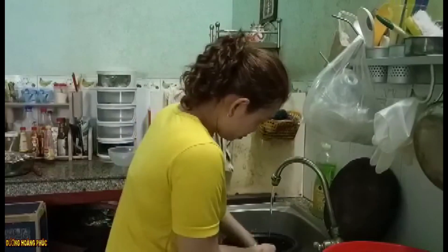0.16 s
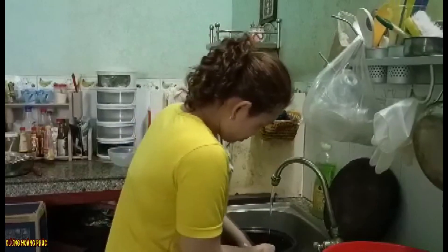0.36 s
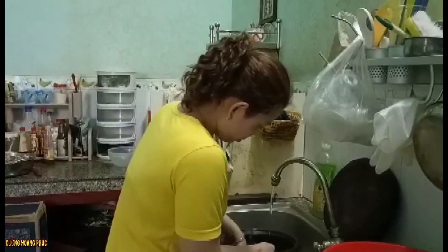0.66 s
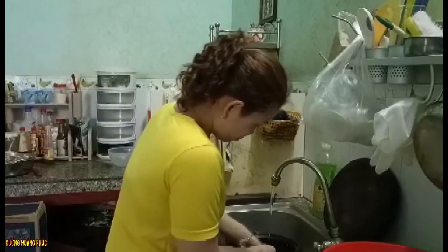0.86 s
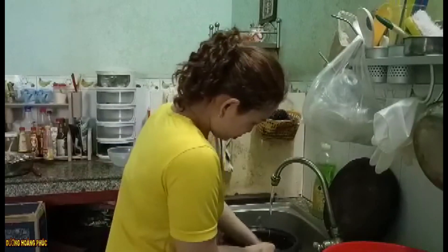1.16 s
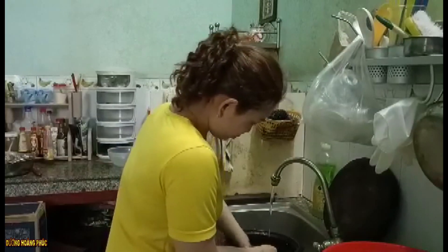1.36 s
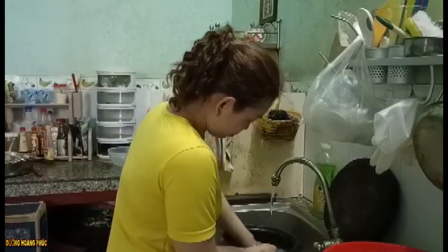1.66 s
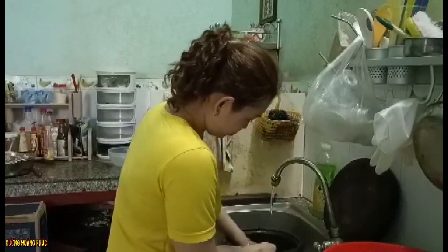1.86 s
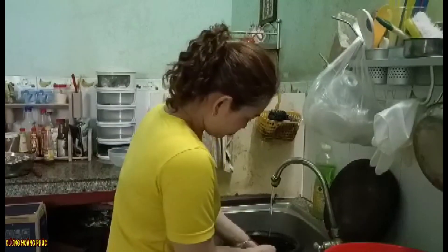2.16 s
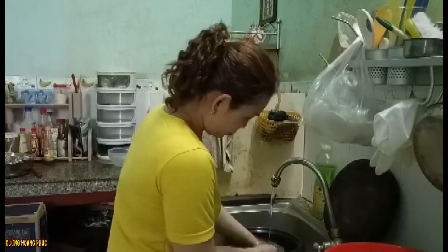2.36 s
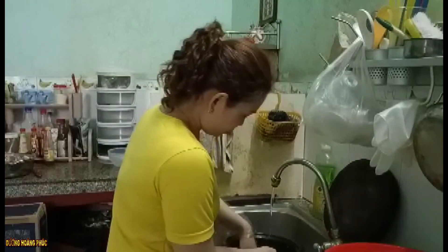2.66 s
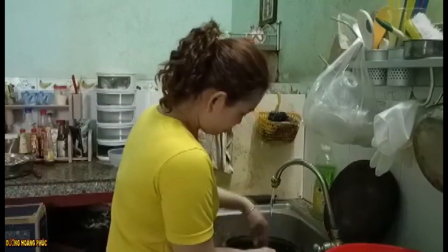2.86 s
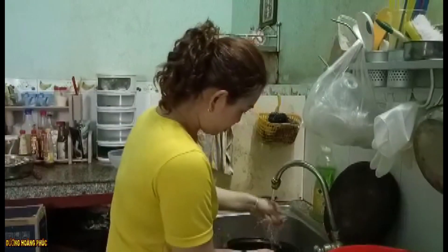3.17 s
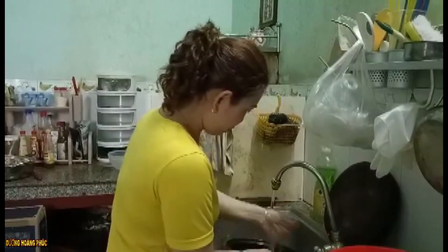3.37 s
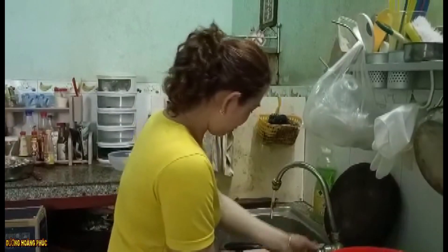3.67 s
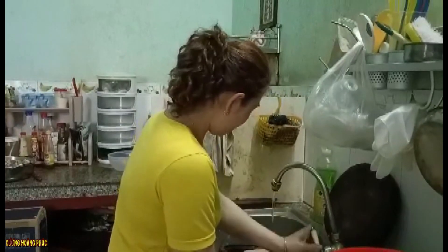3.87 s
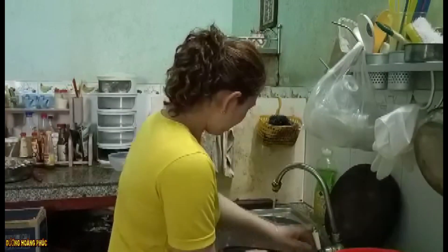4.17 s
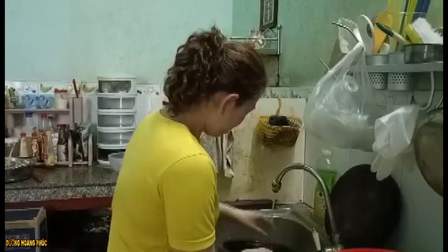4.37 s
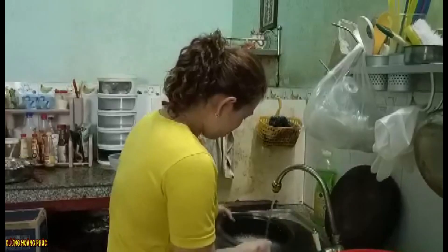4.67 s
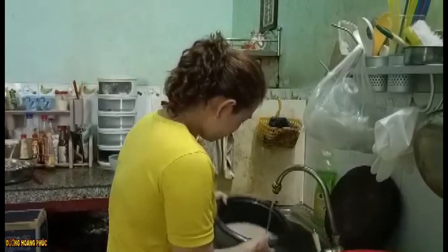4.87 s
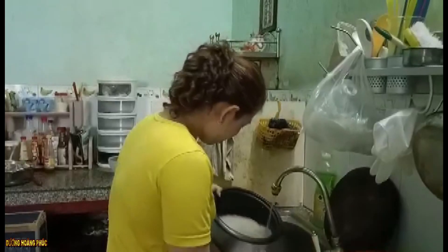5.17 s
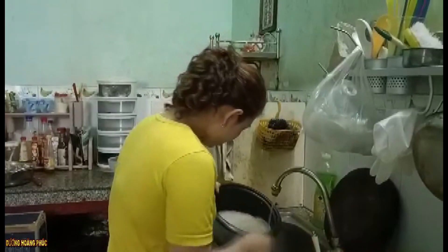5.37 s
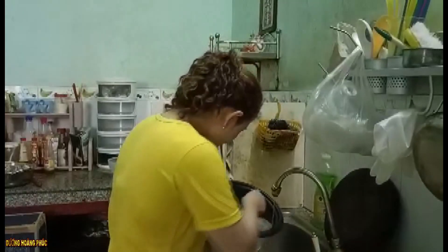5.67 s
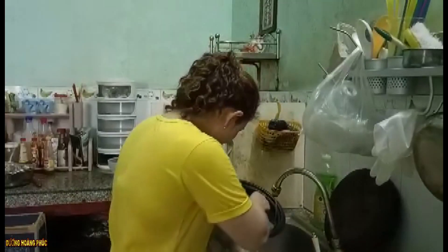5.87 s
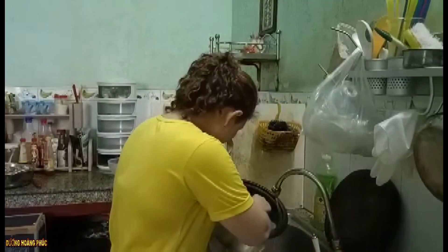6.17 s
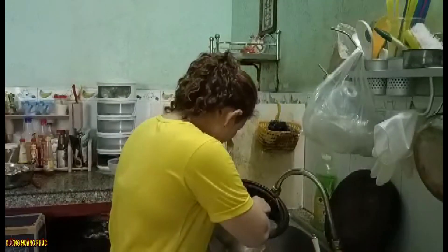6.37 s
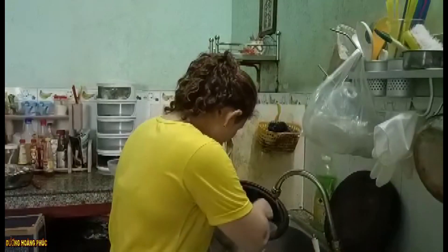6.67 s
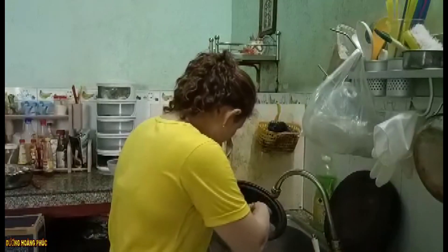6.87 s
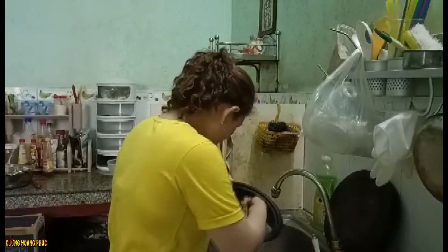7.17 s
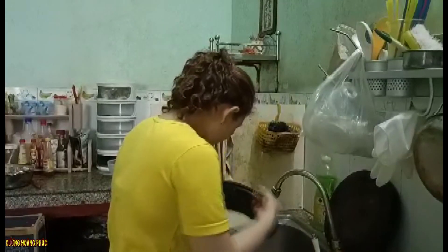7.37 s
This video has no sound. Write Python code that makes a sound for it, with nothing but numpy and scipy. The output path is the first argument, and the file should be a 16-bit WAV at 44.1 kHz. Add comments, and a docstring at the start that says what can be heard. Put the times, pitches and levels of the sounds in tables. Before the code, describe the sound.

Rice is swished by hand in a pot under a thin tap, splashing and clacking, then rinse water drums into a steel sink.

```python
"""Washing rice under a thin tap

Rice is washed by hand in a pot in the steel sink of a small tiled kitchen; every layer is synthesized.
The stream is a fizz of tiny ringing bubbles that flares as the circling hand cuts it. Strokes swell beds of
larger bubbles, rising sines plop, struck modes clack, and filtered slips scrape the pot on the sink.
Then the pot is tilted and rinse water, as dense random impacts, drums the sink's resonances in a few surges."""
import sys
import numpy as np
from scipy import signal
from scipy.fft import rfft, irfft, next_fast_len
from scipy.io import wavfile

SR = 44100
rng = np.random.default_rng(int(sys.argv[2]) if len(sys.argv) > 2 else 0)


def log_audio(samples):
    """Write samples as a 16-bit WAV file to the path given in sys.argv[1]."""
    # one column per channel
    frames = np.atleast_2d(samples).T
    # limit to full scale, then quantise
    limited = np.clip(frames, -1, 1)
    pcm = np.round(limited * 32767).astype(np.int16)
    wavfile.write(sys.argv[1], SR, pcm)


N = 332053
TIME = np.arange(N) / SR
KITCHEN_T60_S = 0.46
CUTOFF_HZ = 13200

# fizz of the stream landing, fading as the pot is lifted away: time_s, level_db
STREAM = [(0.0, -45.5), (0.9, -47), (1.35, -52), (2.2, -47.5), (2.6, -52), (3.35, -56), (4.0, -49),
          (4.85, -52.5), (5.05, -58.5), (5.7, -60), (6.0, -66), (7.525, -69.5)]


def washing(slosh_gain, splash_gain, spray_gain):
    """The hand traps large bubbles and breaks up small ones, both in the pot's hollow, and throws spray."""
    # colours of large bubbles, small bubbles and droplets: pitch_hz, level_db (per Hz)
    slosh_colour = [(250, -11), (400, -1), (560, -2), (780, 6), (1100, 11.5), (1500, 6.5), (2000, 5.5),
                    (3000, -17)]
    splash_colour = [(1000, -84), (1500, 3.5), (1900, 8.5), (2200, 10.5), (2600, 9.5), (3200, 6.5),
                     (4200, -47)]
    spray_colour = [(2000, -15), (2800, 7.5), (3500, 5), (4000, 4), (4700, 5), (5600, 1.5), (6800, -5),
                    (8500, -2.5), (12000, -105)]
    # peaks and dips of the pot's hollow: pitch_hz, q, gain_db
    hollow = [(590, 6.2, 1.5), (837, 6.9, -7), (1180, 13, 7.5), (1590, 17, 0.5), (2200, 12, 1),
              (2904, 11, -9)]

    large = bubbles(slosh_colour, per_s=700, cycles=18, spread_db=4.2, clump_db=3.0)
    slosh = slosh_gain * from_db(2) * rms_one(resonate(large, hollow))
    small = bubbles(splash_colour, per_s=520, cycles=20, spread_db=2.5, clump_db=2.6)
    splash = splash_gain * from_db(-3.5) * rms_one(resonate(small, hollow))
    droplets = bubbles(spray_colour, per_s=5000, cycles=110, spread_db=6.0, clump_db=2.0)
    spray = spray_gain * from_db(2.5) * droplets
    return slosh + splash + spray


def stirring():
    """Gains of slosh, splash and spray: the strokes on top of the stream's own trickle."""
    # strokes of the hand and swings of the pot:
    # start_s, length_s, slosh_db (large bubbles), splash_db (small bubbles), spray_db (droplets)
    strokes = [(0.0, 0.1, -42.5, -34.5, -52), (0.117, 0.072, -39.5, -32.5, -47),
               (0.222, .14, -43, -35, -46), (0.387, 0.09, -40.5, -34, -44),
               (0.465, 0.059, -39.5, -34, -43.5), (0.549, 0.24, -44, -36, -50),
               (1.063, 0.076, -56, -41, -47.5), (1.137, 0.08, -42.5, -55, -52),
               (1.25, 0.046, -53, -34.5, -55), (1.467, 0.11, -54, -46, -70),
               (1.664, 0.029, -54, -41.5, -51), (1.837, 0.087, -63, -47, -57),
               (2.552, 0.25, -61, -43.5, -56), (2.957, 0.083, -54, -43.5, -41),
               (3.078, 0.02, -52.5, -64, -48), (3.461, 0.078, -48.5, -72, -61),
               (3.544, 0.094, -49.5, -33, -46.5), (4.29, 0.11, -46.5, -41, -42),
               (4.465, 0.069, -44, -49, -66), (4.626, 0.085, -39.5, -36, -49),
               (4.739, 0.091, -53, -41.5, -48), (4.88, 0.15, -56, -48.5, -51.5),
               (5.02, 0.18, -51, -53, -51.5), (5.214, 0.12, -56.5, -51, -56), (5.363, 0.017, -50, -35, -50),
               (6.935, 0.16, -57, -55.5, -70)]
    trickle_levels_db = (-65, -49.5, -54.5)  # slosh, splash and spray at the start
    trickle_follows = 0.49  # share of the stream's fading, in dB

    stream_db, = in_time(STREAM)
    fading_db = trickle_follows * (stream_db - stream_db[0])
    start_s, length_s, *levels = np.transpose(strokes)
    gains = []
    for level_db, trickle_db in zip(levels, trickle_levels_db):
        stroke_gain = swells(zip(start_s, length_s, level_db), rise_s=0.0054, settle_db_per_s=153)
        gains.append(np.hypot(stroke_gain, from_db(trickle_db + fading_db)))
    return gains


def tap():
    """The thin stream bursts into tiny, short-lived bubbles, louder where it breaks on the hand."""
    # flares as the circling hand cuts the stream: start_s, length_s, level_db
    flares = [(0.11, 0.1, -37.5), (0.41, 0.048, -37), (0.8, 0.026, -42), (1.05, 0.015, -39),
              (1.48, 0.063, -38.5), (1.96, 0.063, -39), (2.33, 0.033, -40), (2.81, 0.27, -41.5),
              (3.55, 0.0058, -35), (3.75, 0.08, -43), (4.235, 0.012, -37), (4.63, 0.022, -46),
              (4.87, 0.016, -45.5), (5.68, 0.017, -71)]
    # colour of the fizz: pitch_hz, level_db (per Hz)
    fizz_colour = [(900, -75), (2000, -12), (3000, -44), (4000, -4), (5000, 3), (6600, 4.5), (8000, 8.5),
                   (10000, 7.5), (13000, 0.5)]

    stream_db, = in_time(STREAM)
    gain = np.hypot(from_db(stream_db), swells(flares, rise_s=0.032, settle_db_per_s=141))
    fizz = bubbles(fizz_colour, per_s=4500, cycles=11.4, spread_db=3.0, clump_db=2.5)
    return gain * from_db(-0.5) * fizz


def gush():
    """The water shatters on the steel into a dense burst of droplets."""
    # a gush against the sink wall: time_s, level_db
    gush_curve = [(4.085, -53), (4.108, -40), (4.117, -27.5), (4.145, -21), (4.2, -26.5), (4.235, -23),
                  (4.29, -28.5), (4.35, -35.5), (4.45, -57)]
    # its colour: pitch_hz, level_db (per Hz)
    gush_colour = [(350, -16), (580, -5), (800, -11.5), (1130, 2.5), (1480, -7.5), (1850, 3.5), (2230, 6),
                   (2550, 7.5), (2850, -1), (3200, 5), (3600, 9), (4050, -17), (4600, 0), (6500, -5.5),
                   (8500, -14), (12500, -58)]

    level_db, = in_time(gush_curve)
    falling = (TIME > gush_curve[0][0]) & (TIME < gush_curve[-1][0])
    droplets = bubbles(gush_colour, per_s=1800, cycles=15, spread_db=2.8, clump_db=0.8)
    return falling * from_db(level_db) * droplets


def plops(swell_s, rise, level_db):
    """The air pockets and drips that stand out, each a sine of rising pitch placed left to right."""
    # air pockets and drips: start_s, relative_db, pitch_hz (middle of the rise), left_over_right_db, t60_s
    plop_list = [(0.026, -26, 1104, -11, 0.056), (0.03, -28, 2700, -3, 0.011),
                 (0.088, -23.5, 2160, -4, 0.0093), (0.122, -26, 2200, 3, 0.022),
                 (0.143, -23.5, 1106, -6, 0.034), (0.173, -24, 2220, -4, 0.0064),
                 (0.172, -29, 1580, -4, .02), (0.2, -30, 1000, -7, 0.028), (0.229, -31, 1630, 5, .014),
                 (0.282, -33.5, 915, 2, .025), (0.284, -29, 1480, -4, 0.026),
                 (0.326, -31.5, 1120, -6, 0.018), (0.366, -33, 2200, -1, .015),
                 (0.393, -20, 2340, 0, 0.017), (0.407, -23, 2330, 2, 0.013), (0.424, -20.5, 2230, 1, 0.016),
                 (0.475, -22, 2230, -2, 0.01), (0.495, -27, 2140, 0, 0.013), (0.497, -36, 630, 0, 0.035),
                 (0.547, -29, 2200, -8, 0.013), (0.572, -28, 2200, -3, 0.019),
                 (0.575, -36.5, 746, 6, 0.027), (0.602, -31, 2340, -7, 0.011), (0.602, -36.5, 565, 0, .025),
                 (0.608, -27.5, 1620, 2, 0.022), (0.626, -30.5, 2200, 3, 0.027),
                 (0.677, -29, 2110, 9, 0.014), (0.681, -30.5, 1085, -3, 0.022),
                 (0.82, -28.5, 2200, 6, 0.018), (1.172, -42.5, 724, 7, 0.072), (1.259, -32, 1015, -8, 0.02),
                 (1.701, -23, 965, -3, 0.028), (1.714, -27.5, 1640, 1.5, 0.022),
                 (1.84, -34, 2790, -2, 0.017), (1.897, -32.5, 2200, -2, 0.015),
                 (1.972, -43.5, 2260, 7, 0.065), (2.717, -39.5, 1110, -6, 0.036),
                 (2.729, -18.5, 2310, -5, 0.018), (2.729, -30.5, 1720, 2, 0.021),
                 (3.11, -47.5, 1257, 0, .15), (3.308, -30, 2352, -2, 0.095), (3.516, -36, 1240, -2, .025),
                 (3.533, -24, 1940, -7, 0.013), (3.573, -33, 1190, -7, .03),
                 (3.589, -13, 2330, -1.5, 0.0093), (3.617, -30, 894, -3, 0.038),
                 (3.621, -22, 2800, -1, 0.022), (3.657, -29, 2370, 0, 0.016), (4.096, -35, 2890, 8, .015),
                 (4.181, -16, 2240, 0, 0.017), (4.2, -22.5, 2146, 11, 0.029), (4.22, -36, 2230, -17, .022),
                 (4.377, -25.5, 1135, -8, 0.022), (4.485, -22.5, 1467, 1, 0.021),
                 (4.495, -30, 1405, 2, 0.021), (4.637, -28, 1124, -10, .02),
                 (4.662, -23.5, 1190, -1, 0.012), (4.685, -21, 2065, -2, 0.018),
                 (4.745, -28.5, 2086, 9, 0.033), (4.768, -29.5, 2026, -1, 0.062),
                 (4.967, -39, 2720, 0, 0.023), (4.994, -33.5, 2500, -1, 0.007),
                 (5.049, -32, 1845, -9, 0.03), (5.076, -37, 2380, -1, 0.018),
                 (5.108, -29.5, 2340, -2, 0.016), (5.215, -42, 1250, -3, 0.033),
                 (5.231, -32, 2060, 6, 0.034), (5.277, -41, 1580, -4, .025), (5.396, -44, 1010, -4.5, .05),
                 (5.599, -42.5, 2510, 12, 0.019)]

    out = np.zeros((2, N))
    for start_s, relative_db, hz, pan_db, t60 in plop_list:
        sides_db = pan_db * np.array([[.5], [-.5]])
        plop = from_db(relative_db + level_db + sides_db) * pocket(hz, t60, swell_s, rise)
        add(out, start_s - swell_s / 2, plop)
    return out


def gurgle(water_gain, low_hz, high_hz, level_db, count):
    """Pockets close at random times, pitches and places, louder where more water is being moved."""
    out = np.zeros((2, N))
    for when, size, weakness, place in rng.random((count, 4)):
        hz = low_hz * (high_hz / low_hz) ** size
        at = int(when * N)
        sides = np.sqrt([[place], [1 - place]])
        gain = water_gain[at] * from_db(level_db - 10 * weakness) * sides
        add(out, at / SR, gain * pocket(hz, t60=40 / hz, swell_s=0.00042, rise=0.14))
    return out


def pocket(hz, t60, swell_s, rise):
    """An air pocket rings and climbs in pitch as it nears the surface; envelope peak 1."""
    t = TIME[:SR // 8]
    shape = (1 - np.exp(-(t / swell_s) ** 2)) * from_db(-60 * t / t60)
    pitch = hz * (1 + rise * (np.minimum(t / t60, 1) - .5))
    return shape / shape.max() * np.sin(2 * np.pi * np.cumsum(pitch) / SR)


def clacks(crack_db, crack_s, level_db):
    """Each blow of the pot cracks briefly and strikes its modes; a brighter touch thins the low ones."""
    # pot rim against steel: start_s, relative_db, brightness_hz (low-pass corner)
    blows = [(0.7131, -11, 4200), (0.7161, -11.5, 5600), (0.7192, -9, 4060), (1.259, -28.5, 2880),
             (2.727, -24.5, 1990), (3.333, -33, 8950), (3.588, -23, 2970), (4.117, -23, 5000),
             (4.146, -17, 3760), (4.457, -25, 9900), (4.597, -31.5, 5960), (4.636, -21, 2500),
             (5.288, -29, 11900)]
    # ringing of the pot: pitch_hz, level_db, t60_s
    pot_modes = [(1163, -3.5, 0.04), (1720, -4, 0.031), (1945, 7, 0.027), (2210, 6.5, 0.015),
                 (2410, 5, 0.02), (4070, -6.5, 0.038), (4290, 0.5, 0.033), (4615, 4, 0.026),
                 (5000, -7, 0.012), (5690, -3, 0.017), (6560, -0.5, 0.0078), (7030, 3.5, 0.014),
                 (8060, 3.5, .015), (9360, -1, 0.023), (11000, 0, 0.0096)]

    out, t = np.zeros(N), TIME[:SR // 5]
    for start_s, relative_db, bright_hz in blows:
        blow = from_db(crack_db) * rng.standard_normal(len(t)) * np.exp(-t / crack_s)
        for hz, mode_db, t60 in pot_modes:
            # the water moving in the pot shifts every mode a little from blow to blow
            shifted_hz = hz * rng.normal(1, .01)
            polarity = rng.choice([-1, 1])
            blow = blow + polarity * from_db(mode_db - 60 * t / t60) * np.sin(2 * np.pi * shifted_hz * t)
        blow = butter(blow, max(700, bright_hz / 3.7), "high", order=4)
        blow = butter(blow, bright_hz, "low", order=1)
        add(out, start_s, from_db(relative_db + level_db) * blow)
    return out


def scrapes(slips_per_s, width, release_s):
    """The pot drags on the steel in quick, uneven slips; the pitch depends on where it touches."""
    # drags as the pot is moved: start_s, length_s, level_db, centre_hz
    drags = [(4.487, 0.026, -39, 1290), (4.501, .09, -47, 1460), (4.503, 0.042, -49, 578),
             (4.592, 0.013, -38, 2300), (4.6, 0.025, -35, 2960), (4.621, 0.12, -39, 2970),
             (4.714, 0.13, -53.5, 314), (4.751, 0.091, -49.5, 642), (4.83, .12, -55.5, 593),
             (4.859, 0.062, -41.5, 3130), (4.952, .11, -53, 573), (5.206, 0.017, -39.5, 2130),
             (5.237, 0.066, -43, 1580), (5.333, 0.051, -44, 560), (5.366, .05, -46, 2900)]

    out, t = np.zeros(N), TIME[:SR // 4]
    for start_s, length_s, level_db, hz in drags:
        slips = (rng.random(len(t)) < slips_per_s / SR) * rng.standard_normal(len(t))
        grating = rms_one(butter(slips + 1e-18, [hz / (1 + width), hz * (1 + width)], "band"))
        release = np.exp(-np.maximum(t - length_s, 0) / release_s)
        add(out, start_s, from_db(level_db) * release * grating)
    return out


def pour():
    """Dense small impacts of poured water shake the bowl, then rasp as it spreads; wet rice swishes."""
    # surges of rinse water from the tilted pot: start_s, length_s, boom_db (sink floor),
    # rumble_db (sink walls), drone_db (higher modes), rasp_db, swish_db (rice)
    surges = [(5.719, 0.046, -43, -54, -45.5, -53, -79), (5.788, 0.034, -27.5, -35, -36.5, -43, -70),
              (5.818, 0.14, -40, -44, -33.5, -39, -50), (5.987, 0.094, -32, -28, -36.5, -37.5, -68),
              (6.069, 0.077, -51, -39.5, -33.5, -34, -40.5), (6.192, 0.039, -39.5, -37.5, -39, -53, -64),
              (6.433, 0.052, -56, -52.5, -54, -52.5, -47.5)]
    # colours of rasp and swish: pitch_hz, level_db (per Hz)
    rasp_colour = [(400, -10), (700, 4.5), (1100, 4.5), (1550, 1.5), (1800, -9), (2300, -16), (3200, -20),
                   (5000, -55)]
    swish_colour = [(900, -12), (1550, 4.5), (2000, 7.5), (2500, -4.5), (3200, -5), (5000, -37)]
    # resonances of the sink walls under running water: pitch_hz, q, gain_db
    walls = [(880, 15, 5), (1050, 25, 4), (1180, 25, 5), (1494, 25, 7.8)]
    # the sink floor carries the lowest resonances, its walls the higher ones
    boom_below_hz, drone_above_hz = 154, 314
    rasp_lag_s = 0.0038

    start_s, length_s, *levels = np.transpose(surges)
    lags_s = (0, 0, 0, rasp_lag_s, rasp_lag_s)
    boom_gain, rumble_gain, drone_gain, rasp_gain, swish_gain = [
        swells(zip(start_s + lag_s, length_s, level_db), rise_s=0.014, settle_db_per_s=126)
        for level_db, lag_s in zip(levels, lags_s)]

    impacts = grains(per_s=2000, spread_db=1.8, clump_db=1.5)
    bowl = butter(sink_bowl(impacts), 101, "high", order=6)
    boom = rms_one(butter(bowl, boom_below_hz, "low", order=8))
    rumble = rms_one(butter(bowl, [boom_below_hz, drone_above_hz], "band", order=4))
    drone = rms_one(butter(bowl, drone_above_hz, "high", order=6))
    drumming = boom_gain * boom + rumble_gain * rumble + drone_gain * drone

    swish = swish_gain * coloured(grains(per_s=1400, spread_db=2.8, clump_db=0.8), swish_colour)
    rasp = rasp_gain * rms_one(resonate(coloured(impacts, rasp_colour), walls))
    glugs = gurgle(rasp_gain, low_hz=520, high_hz=1600, level_db=8, count=450)
    return reflect(drumming, t60=0.18, wet_db=-9) + reflect(rasp + glugs + swish, t60=0.25, wet_db=8)


def sink_bowl(push):
    """The narrow resonances of the thin steel bowl, rolled off steeply above 640 Hz."""
    # resonances of the bowl: pitch_hz, width_hz, level_db
    bowl_modes = [(107, 10, -4), (116.5, 7, 9), (136.4, 7, 8), (180.5, 7, 9), (201, 9, 4), (236.8, 6, 7),
                  (264.4, 7, 3), (297, 10, -5), (368, 14, 4), (428, 22, 6), (464, 16, 3), (526, 20, 1),
                  (621, 50, -7)]

    ringing = np.zeros(N)
    for hz, width_hz, level_db in bowl_modes:
        b, a = signal.iirpeak(hz, hz / max(width_hz, 2), fs=SR)
        ringing += from_db(level_db) * signal.lfilter(b, a, push)
    return butter(ringing, 640, "low", order=4)


def bumps(swell_s, level_db):
    """A soft push shakes one region of the bowl's range and dies away."""
    # soft bumps on the sink bowl: start_s, relative_db, centre_hz, t60_s
    pushes = [(1.487, -48.5, 460, 0.11), (2.6, -52.5, 600, 0.21), (3.453, -40, 427, 0.52),
              (3.462, -39, 1030, 0.15), (3.522, -44.5, 179, 0.18), (3.875, -52, 650, 0.17),
              (4.1, -38, 605, 0.089), (4.117, -21.5, 214.4, 0.084), (4.118, -42, 150, 0.12),
              (4.125, -34.5, 320, 0.18), (4.635, -43, 193, 0.2), (5.246, -39.5, 450, 0.15),
              (6.951, -44, 453, 0.47), (6.955, -44, 774, 0.35), (7.019, -49, 170, 0.44)]

    out, t = np.zeros(N), TIME[:SR // 2]
    for start_s, relative_db, hz, t60 in pushes:
        shudder = rms_one(butter(rng.standard_normal(len(t)), [hz * 0.863, hz * 1.175], "band", order=3))
        shape = from_db(relative_db + level_db - 60 * t / t60) * (1 - np.exp(-t / swell_s))
        add(out, start_s - swell_s, shape * shudder)
    return out


def small_sounds():
    """Very bright ticks of decaying noise and a thin sine squeak that arches in pitch."""
    # a thin squeak: time_s, pitch_hz, level_db
    squeak = [(7.24, 8960, -58), (7.29, 9300, -53), (7.34, 9800, -66), (7.39, 9060, -55), (7.43, 8800, -72)]
    # fine, very bright ticks: start_s, level_db, t60_s
    ticks = [(3.227, -35, 0.0057), (4.867, -34, 0.012), (5.825, -37, 0.0055), (5.842, -33.5, 0.026)]

    hz, level_db = in_time(squeak)
    sounding = (TIME > squeak[0][0]) & (TIME < squeak[-1][0])
    tuning = 1 + 0.0059 * rng.standard_normal()  # one random detuning of the whole squeak
    out = from_db(level_db) * sounding * np.sin(2 * np.pi * np.cumsum(hz * tuning) / SR)
    t = TIME[:SR // 4]
    for start_s, tick_db, t60 in ticks:
        tick = rms_one(butter(rng.standard_normal(len(t)), [8500, 12400], "band", order=3))
        add(out, start_s, from_db(tick_db - 60 * t / t60) * tick)
    return out


def room_air():
    """The steady background of the room: coloured diffuse noise."""
    # colour of the air: pitch_hz, level_db (per Hz)
    air_colour = [(25, -51), (50, -1), (70, -17.5), (100, 0), (150, -6), (220, -12.5), (280, 6),
                  (340, -3.5), (520, -4), (750, -12), (2200, -7.5), (4000, -17.5), (7000, -21.5),
                  (13000, -32)]
    return from_db(-55) * coloured(diffuse(N), air_colour)


def bubbles(spectrum, per_s, cycles, spread_db, clump_db):
    """Bubbles of many sizes, each falling 60 dB in a set number of cycles, echo from three places; rms 1."""
    clicks = grains(per_s, spread_db, clump_db)
    dealt = rng.integers(0, 39, N)  # which of 39 pitches each click rings
    pitches = np.geomspace(spectrum[0][0], min(spectrum[-1][0], CUTOFF_HZ), 39)
    places = np.zeros((3, N))
    for k, hz in enumerate(pitches):
        places[k % len(places)] += hz * ring(clicks * (dealt == k), hz, cycles / hz)
    # each place has its own echoes round the sink bowl
    return coloured(sum(reflect(place, t60=0.17, wet_db=6.5) for place in places), spectrum)


def grains(per_s, spread_db, clump_db):
    """Random clicks of very uneven size, whose level wanders so that they seem to clump."""
    born = rng.random(N) < per_s / SR
    sizes = from_db(spread_db * np.minimum(rng.exponential(1, N), 4) + clump_db * drift(45))
    return born * sizes * rng.choice([-1, 1], N)


def swells(events, rise_s, settle_db_per_s):
    """Gain of water set moving by (start_s, length_s, level_db) events: rise, hold, then settle."""
    power = np.zeros(N)
    for start_s, length_s, level_db in events:
        rise = .5 + .5 * np.tanh((TIME - start_s) / (2 * rise_s))
        settling_db = settle_db_per_s * np.maximum(TIME - start_s - length_s, 0)
        power += (rise * from_db(level_db - settling_db)) ** 2
    return np.sqrt(power)


def ring(clicks, hz, t60):
    """A unit click sets a decaying sine of initial height 1 ringing."""
    r, w = from_db(-60 / (t60 * SR)), 2 * np.pi * hz / SR
    return signal.lfilter([0, np.sin(w)], [1, -2 * r * np.cos(w), r * r], clicks + 1e-18)


def resonate(x, resonances):
    """The peaks and dips of a hollow or a panel, from (pitch_hz, q, gain_db) rows."""
    for hz, q, gain_db in resonances:
        b, a = signal.iirpeak(hz, q * from_db(gain_db / 2), fs=SR)
        x = x + (from_db(gain_db) - 1) * signal.lfilter(b, a, x)
    return x


def reflect(x, t60, wet_db):
    """Direct sound plus a dying stereo wash of reflections, at about unchanged power."""
    t = TIME[:SR // 2]
    tail = diffuse(len(t)) * from_db(-60 * t / t60) * (t > .002)
    response = from_db(wet_db) * tail / np.sqrt(np.sum(tail ** 2) / 2)
    response[:, 0] += 1  # the direct sound
    wet = signal.fftconvolve(np.atleast_2d(x), response, axes=-1)[:, :N]
    return wet / np.sqrt(1 + from_db(wet_db) ** 2)


def diffuse(size):
    """Stereo noise from all round: alike in the bass, unrelated in the treble."""
    # left-right likeness of the room's sound: pitch_hz, likeness (0-1)
    likeness = [(60, 0.93), (150, 0.72), (300, 0.93), (600, 0.58), (1200, 0), (3000, 0), (13000, 0)]

    mid, side = rfft(rng.standard_normal((2, size)))
    alike = np.clip(at_hz(likeness, np.arange(len(mid)) * SR / size), 0, 1)
    return irfft(np.sqrt((1 + alike) / 2) * mid + np.sqrt((1 - alike) / 2) * side * [[1], [-1]], size)


def coloured(x, spectrum):
    """Give a signal a smooth colour; rms 1."""
    size = next_fast_len(N)
    hz = np.arange(size // 2 + 1) * SR / size
    return rms_one(irfft(rfft(x, size) * from_db(at_hz(spectrum, hz)), size)[..., :N])


def drift(rate):
    """Random wander through a new normal value rate times a second, joined by straight lines."""
    knots = rng.standard_normal(4000)
    return np.interp(TIME * rate, np.arange(len(knots)), knots)


def butter(x, hz, kind, order=2):
    """Butterworth filter with its corners kept in the usable range."""
    sos = signal.butter(order, np.clip(hz, 10, .45 * SR), kind, fs=SR, output="sos")
    return signal.sosfilt(sos, x)


def from_db(db):
    """Decibels to amplitude."""
    return 10 ** (np.asarray(db) / 20)


def rms_one(x):
    """Scale a signal to rms 1."""
    return x / np.sqrt(np.mean(x ** 2) + 1e-20)


def in_time(rows):
    """Each column of a curve at every sample."""
    time_s, *columns = np.transpose(rows)
    return [np.interp(TIME, time_s, column) for column in columns]


def at_hz(points, hz):
    """A spectrum read on a log-frequency axis."""
    point_hz, values = np.transpose(points)
    return np.interp(np.log(np.maximum(hz, 1)), np.log(point_hz), values)


def add(track, start_s, sound):
    """Mix a short sound in at its start time."""
    start = max(round(start_s * SR), 0)
    track[..., start:start + sound.shape[-1]] += sound[..., :N - start]


def scene():
    """Water and blows in the tiled kitchen, over its steady air."""
    slosh_gain, splash_gain, spray_gain = stirring()
    water = washing(slosh_gain, splash_gain, spray_gain) + tap() + gush()

    pockets = plops(swell_s=0.002485, rise=0.035, level_db=1.0)
    pockets = pockets + gurgle(slosh_gain, low_hz=590, high_hz=2130, level_db=3.5, count=520)
    pockets = pockets + gurgle(splash_gain, low_hz=1850, high_hz=2500, level_db=2, count=400)
    dragging = scrapes(slips_per_s=860, width=0.076, release_s=0.0095)

    blows = clacks(crack_db=-7, crack_s=0.0019, level_db=-8.5) + small_sounds()
    thuds = bumps(swell_s=0.00846, level_db=3.5)

    mix = reflect(water, t60=0.023, wet_db=-6.5)
    mix = mix + reflect(pockets + dragging, t60=0.27, wet_db=1.5)
    mix = mix + reflect(blows, KITCHEN_T60_S, wet_db=5.5)
    mix = mix + reflect(thuds, KITCHEN_T60_S, wet_db=-0.5)
    return mix + pour() + room_air()


def record(dry):
    """Each microphone port colours its own channel by resonance; a steep low-pass cuts the top."""
    # resonances of the two microphone ports: pitch_hz, q, gain_db
    left_port = [(2230, 6.1, 6.5), (6660, 4.4, 20), (8580, 2.35, -15), (12340, 3.6, 8)]
    right_port = [(2500, 0.8, -5), (6640, 2.8, -5.5)]

    heard = np.array([resonate(dry[0], left_port), resonate(dry[1], right_port)])
    return signal.sosfilt(signal.ellip(12, .2, 80, CUTOFF_HZ, fs=SR, output="sos"), heard)


dry = scene()
out = record(dry)
log_audio(out)
```